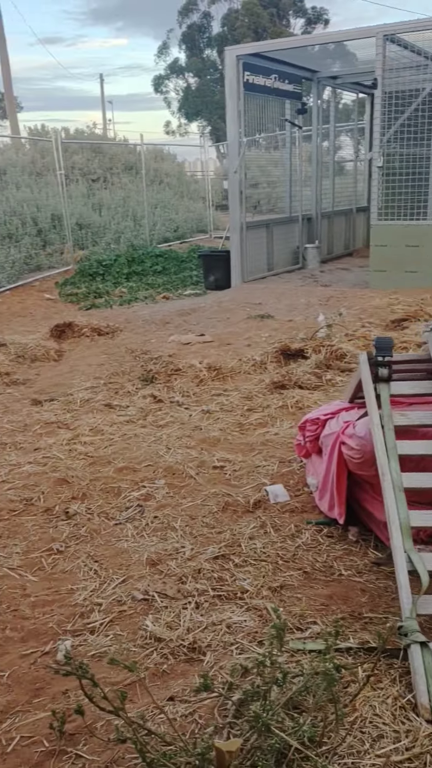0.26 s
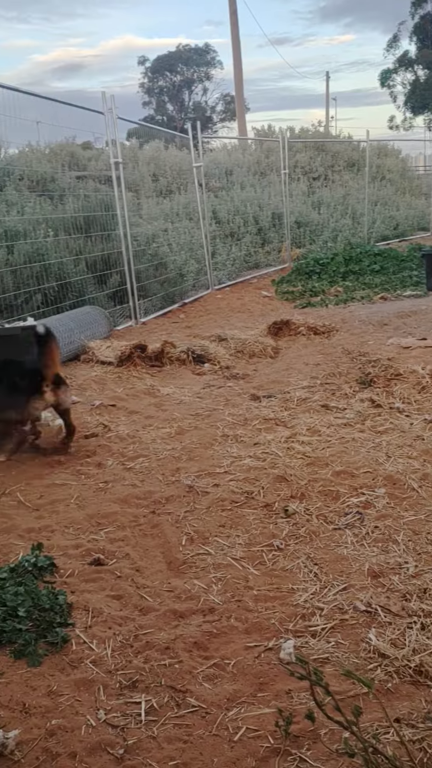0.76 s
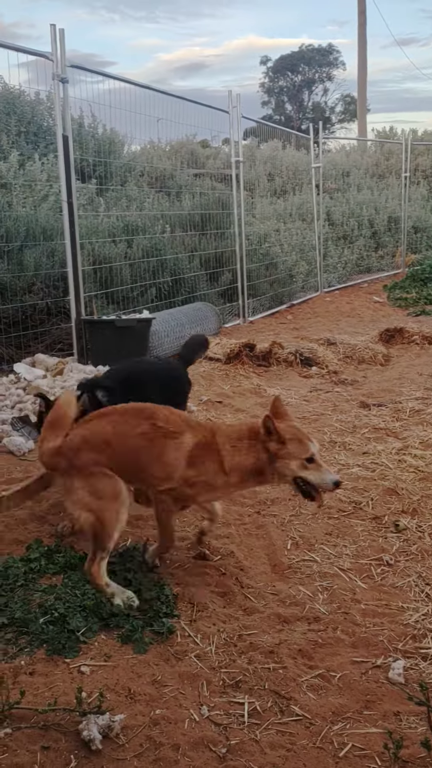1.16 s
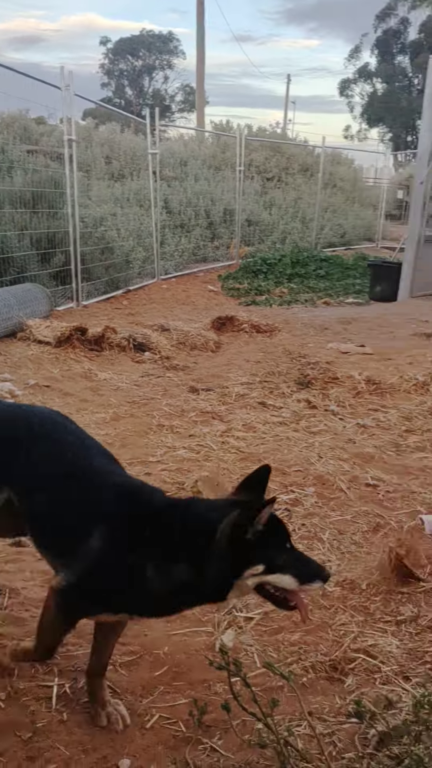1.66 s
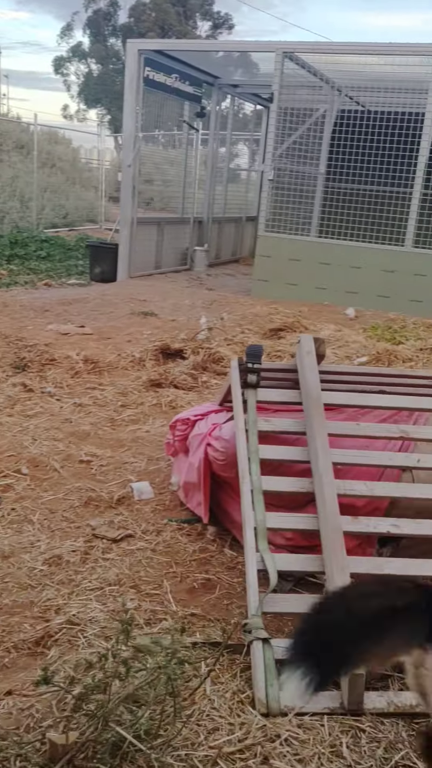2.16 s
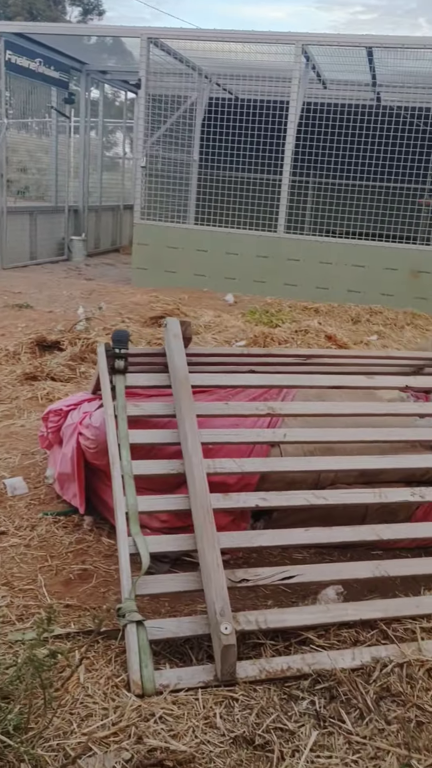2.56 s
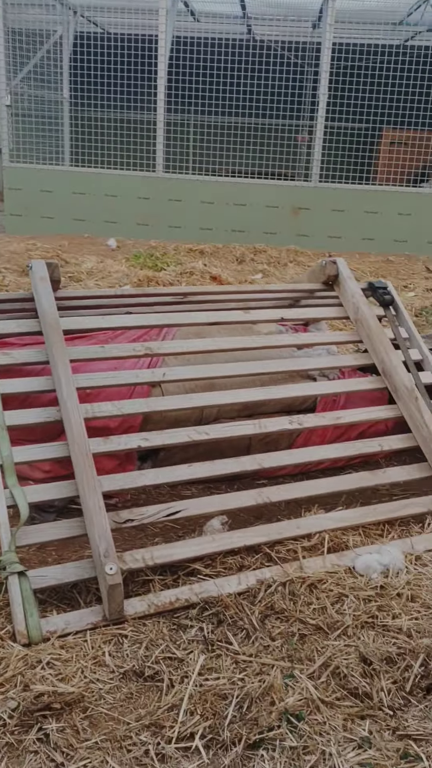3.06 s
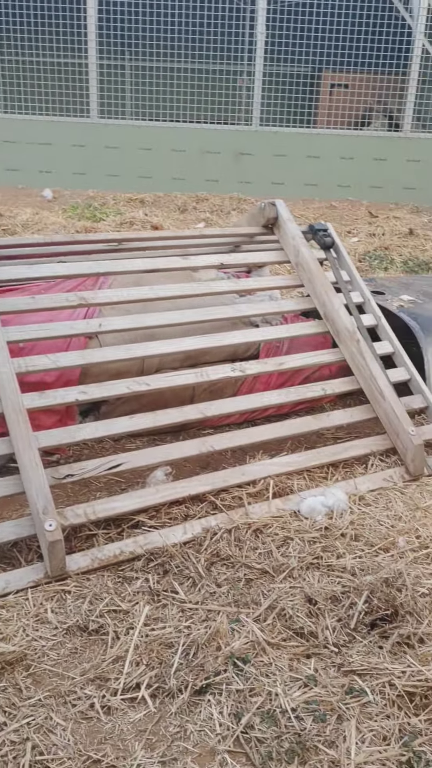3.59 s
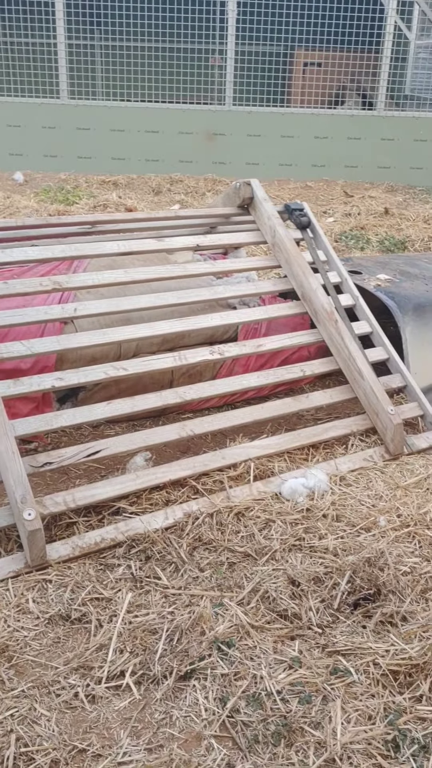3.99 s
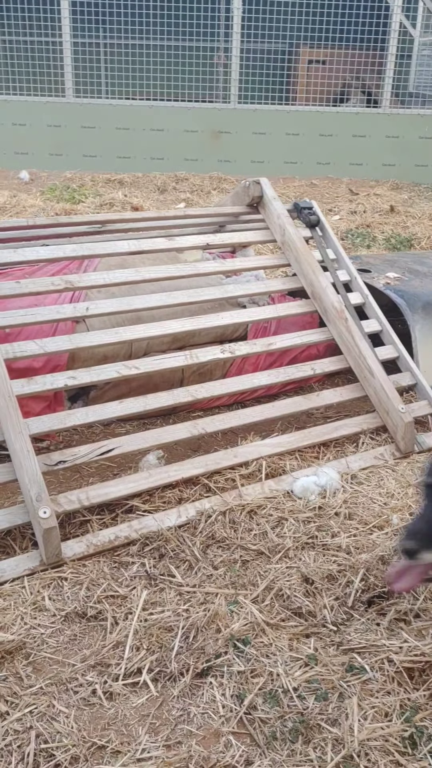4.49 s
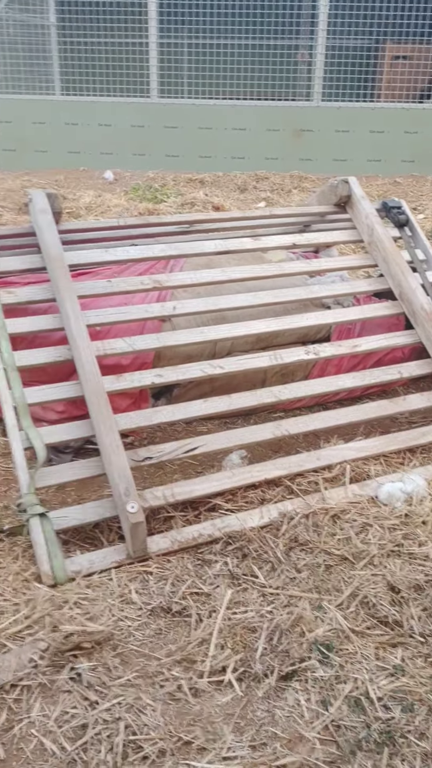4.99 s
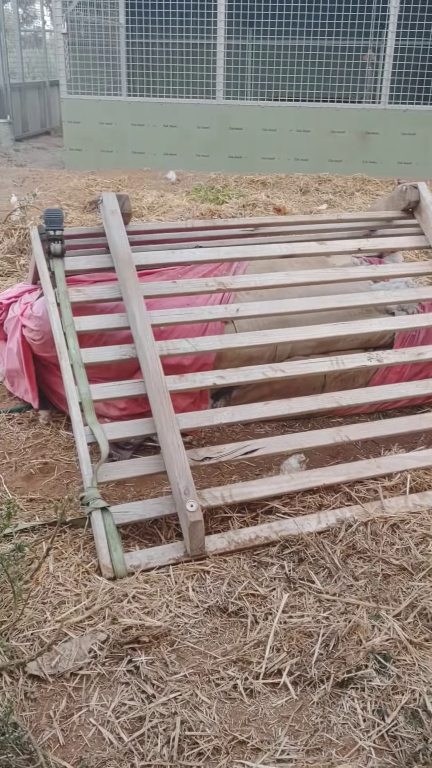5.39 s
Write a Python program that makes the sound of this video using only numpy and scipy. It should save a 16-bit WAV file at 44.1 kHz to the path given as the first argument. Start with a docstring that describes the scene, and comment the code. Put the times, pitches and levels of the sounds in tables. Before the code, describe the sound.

A quiet open yard with soft airy noise, heard in close stereo. Quick low paw thuds and a short pant start at once, fading by 0.3 s as a faint hum and insect chirrs on the left come through. Light knocks and a scuff land around 0.7 to 0.9 s. At 1.3 to 1.45 s a sharp yelp jumps out, with scuffs, thuds and straw snaps after it. From 1.7 to 1.86 s higher, rough yelps overlap. At 2.04 s a loud crack slams the metal pen, which rings and rattles, with two more yelps until 2.2 s and a brief echo. Then it calms: rustling, a cluster of thuds and knocks with a brief hum around 3.0 to 3.2 s. From 3.6 s to the end, soft intermittent panting, dry straw crackle, sparse footfalls and faint chirrs, with one thin bird whistle at 4.7 s.

```python
"""Dogs chase each other round a dirt yard strewn with straw, heard on two ports by a mesh and metal pen.
Under open air (coloured noise), paws thud (damped sines) and breath pants (noise through resonances);
an insect chirrs far to the left, a low hum comes and goes, then bumps ring the pen's modes.
Yelps (gliding harmonics and pulsed air) crowd the next second, amid scuffs and snapping straw (grains
and clicks). Later the panting returns, and a small bird gives one thin whistle near the middle."""
import sys
import numpy as np
from scipy import signal
from scipy.fft import rfft, irfft, next_fast_len
from scipy.io import wavfile

SR = 44100
rng = np.random.default_rng(int(sys.argv[2]) if len(sys.argv) > 2 else 0)


def generate_wav(signal):
    """Clip the signal to [-1, 1] and save it as 16-bit WAV at the path in sys.argv[1]."""
    frames = np.transpose(np.atleast_2d(signal))
    scaled = np.clip(frames, -1, 1) * 32767
    pcm = np.round(scaled).astype(np.int16)
    wavfile.write(sys.argv[1], SR, pcm)


N = 248724   # length in samples

# Open air over the yard. Each row: frequency in Hz, relative density in dB per Hz.
AIR = [(15, -58), (25, -0.5), (92, -5), (206, 0.5), (427, -12), (560, -8.5), (1230, -8.5), (3250, -15),
       (3920, -13), (4490, -21.5), (6210, -19.5), (8830, -30.5), (16000, -40.5)]
AIR_DB = -63.5
# Stereo image of the noise layers. Each row: frequency in Hz, left-right likeness from -1 to 1.
LIKENESS = [(60, 0.86), (180, 1), (550, 0.71), (1650, 0.25), (4970, -0.18), (15000, 0.023)]
# Stereo lean of the noise layers. Each row: frequency in Hz, left minus right in dB.
BALANCE_DB = [(60, -1), (180, 2.5), (550, 1), (1650, -0.5), (4970, 7), (15000, -9)]

# Swells of a low hum. Each row: full strength reached in seconds, hold in seconds, level in dB.
HUM_SWELLS = [(.324, 0.061, -55), (0.538, 0.16, -60), (2.617, 0.086, -57.5), (2.82, 0.19, -56.5),
              (3.156, 0.026, -47)]
HUM_HZ, HUM_RISE, HUM_FALL = 109, 340, 140   # Hz, dB per s, dB per s

# Insect chirrs. Each row: full strength reached in seconds, hold in seconds, pitch in Hz, level in dB.
CHIRRS = [(0.183, .005, 3810, -65), (0.3, 0.0039, 3610, -69), (1.028, 0.029, 3780, -69.5),
          (1.216, 0.018, 3760, -63.5), (1.28, .02, 3810, -69.5), (3.06, 0.028, 3870, -78),
          (3.208, 0.059, 3770, -64.5), (3.325, 0.05, 3760, -71), (3.45, 0.081, 3920, -67),
          (3.665, .06, 3950, -63), (3.748, 0.034, 4020, -73), (3.842, .01, 3940, -69),
          (4.246, 0.038, 3920, -77.5), (4.76, 0.012, 3800, -71)]
CHIRR_RISE, CHIRR_FALL = 220, 240   # dB per s
# Course of the bird's whistle. Each row: time in seconds, pitch in Hz, level in dB; both then waver.
WHISTLE = [(4.62, 5130, -105), (4.635, 5230, -67), (4.66, 5200, -64), (4.672, 5270, -82),
           (4.685, 5430, -65), (4.71, 5320, -59), (4.73, 4600, -76), (4.74, 4230, -92)]

# Paws pushing off or sliding. Each row: full strength reached in seconds, hold in seconds,
# ground rumble in dB, dirt scuff in dB, straw rustle in dB.
STRIDES = [(.01, 0.11, -43, -53.5, -70), (0.308, 0.13, -54.5, -56.5, -93), (0.456, 0.11, -71, -57, -68),
           (0.715, 0.01, -55, -43.5, -61.5), (0.855, 0.11, -61.5, -59, -62), (1.188, .01, -62.5, -62, -65),
           (1.384, 0.055, -65, -48, -55.5), (1.523, 0.008, -52, -45, -67), (1.564, 0.079, -51.5, -47, -48),
           (1.718, .03, -48.5, -42.5, -54), (1.799, 0.031, -44, -43, -51.5),
           (1.888, 0.05, -43.5, -55, -55.5), (1.996, 0.0099, -44, -46, -54.5),
           (2.044, 0.0017, -49, -30.5, -66), (2.055, 0.049, -39, -60, -55),
           (2.205, 0.016, -40.5, -45.5, -48), (2.38, 0.025, -45, -51, -48.5),
           (2.569, 0.032, -59.5, -60.5, -52), (2.746, 0.13, -59.5, -67, -59.5),
           (2.903, 0.0079, -70, -72, -57.5), (2.97, 0.0048, -55, -61, -62), (3.12, .02, -49, -45, -46.5),
           (3.202, 0.077, -52.5, -63, -54.5), (3.47, 0.057, -60.5, -84, -51.5),
           (3.676, 0.056, -60, -62.5, -46.5), (3.896, 0.1, -66, -80, -53.5), (4.019, 0.068, -56, -81, -49),
           (4.254, 0.092, -66, -79, -56.5), (4.416, 0.014, -48, -58, -55.5),
           (4.453, 0.021, -68, -55.5, -56), (4.554, 0.007, -65, -60, -52.5),
           (4.768, 0.011, -69, -79, -53.5), (4.948, 0.11, -75, -64.5, -59),
           (5.194, 0.012, -59.5, -57, -56.5), (5.415, 0.054, -63.5, -54.5, -62),
           (5.546, 0.016, -61.5, -87, -84)]
# Colour of the ground's rumble. Each row: frequency in Hz, relative density in dB per Hz.
RUMBLE = [(18, -94), (30, -35), (102, -2), (347, -11.5), (381, -20.5), (439, -22), (500, -22), (650, -61.5),
          (1100, -120)]
# Colour of scuffed dirt. Each row: frequency in Hz, relative density in dB per Hz.
SCUFF = [(180, -5.5), (300, 2.5), (459, -4), (647, 1.5), (743, 1), (1360, -2), (1970, -7), (3660, -7.5),
         (4750, -17.5), (8000, -21), (10400, -71), (17600, -120)]
# Colour of rustling straw. Each row: frequency in Hz, relative density in dB per Hz.
STRAW = [(2060, -18), (3500, -15.5), (3950, -3.5), (5220, -10), (5900, -4.5), (7900, -12.5), (15100, -16.5),
         (16000, -1)]
# rise and fall in dB per s, and the level in dB between strides
RUMBLE_RISE, RUMBLE_FALL, RUMBLE_BED_DB = 230, 189, -70.5
SCUFF_RISE, SCUFF_FALL, SCUFF_BED_DB = 1010, 165, -66.5
STRAW_RISE, STRAW_FALL, STRAW_BED_DB = 200, 117, -70

# Straws snapping. Each row: start in seconds, level in dB, click pitch in Hz, left minus right in dB.
SNAPS = [(0.2012, -55, 6110, 1), (0.38, -50.5, 4770, 3), (0.6722, -45.5, 3980, 9.0),
         (1.2745, -52.5, 4300, 19), (1.5255, -35.5, 5800, 11), (1.564, -37, 4500, 13),
         (1.693, -49, 6060, 4), (2.0043, -40.5, 5750, 6), (2.742, -49, 4340, 8), (2.9711, -53, 5900, -1),
         (3.4944, -47, 4420, -7), (3.575, -48.5, 2450, 3), (3.6499, -38.5, 6770, 6), (3.738, -43, 4600, -5),
         (3.8495, -49, 4220, -3), (3.9672, -42, 6900, 5), (3.9943, -52, 4310, 2.0), (4.079, -45, 7260, 0.5),
         (4.3456, -62, 4700, 5), (4.3799, -50, 2500, 0.5), (4.4494, -42, 5370, 0.5), (4.7471, -49, 6270, 6),
         (4.8297, -40.5, 4530, 9), (4.875, -44.5, 5770, 4), (4.9044, -56, 4610, 2.5),
         (4.9397, -55, 4780, 5.0), (4.9555, -53, 6040, 11), (5.5154, -54, 7540, 1.5)]
# Paws landing. Each row: start in seconds, peak in dB before placing, pitch in Hz, 60 dB decay in seconds.
THUDS = [(0.038, -30, 213, 0.023), (0.069, -32, 159, 0.035), (0.099, -30, 137, 0.062),
         (0.307, -42.5, 115, 0.07), (0.332, -49, 104, 0.062), (0.745, -34.5, 272, 0.015),
         (0.815, -50, 263, 0.045), (0.825, -44, 115, 0.038), (0.916, -44.5, 220, 0.027),
         (1.181, -50.5, 235, 0.096), (1.406, -31, 247, 0.019), (1.444, -28, 240, 0.044),
         (1.601, -29.5, 216, 0.013), (1.65, -33, 97, 0.023), (1.68, -38.5, 121, 0.11),
         (1.824, -37, 170, 0.2), (1.939, -39, 177, 0.074), (2.039, -27, 161.5, 0.15),
         (2.064, -33.5, 186, 0.18), (2.738, -50, 226, 0.085), (2.84, -46.5, 110, 0.06),
         (2.959, -34.5, 145, 0.047), (2.981, -39, 240, 0.049), (3.101, -36.5, 260, 0.032),
         (3.127, -37, 268, 0.026), (3.165, -31.5, 250, 0.045), (3.445, -46.5, 198, 0.062),
         (3.997, -41.5, 181, 0.12), (4.038, -42, 243, 0.083), (4.382, -38.5, 232, 0.093),
         (4.415, -45, 241, 0.018), (4.948, -50.5, 238, 0.054), (5.027, -37, 218, 0.014),
         (5.136, -47, 213, 0.013), (5.176, -47, 188, 0.12), (5.407, -60, 191, 0.038),
         (5.474, -45.5, 100, 0.14)]

# Bumps against the pen. Each row: start in seconds, crack peak in dB before placing, crack centre in Hz,
# crack width as a ratio, crack decay constant in seconds, rattle in dB relative to the crack,
# rattle decay constant in seconds, left minus right in dB, left lag in ms.
BUMPS = [(0.711, -26, 2780, 1.23, 0.013, -43, 0.014, 8, 0.046),
         (0.7493, -25, 1086, 3.1, 0.0018, -41, 0.008, 0.5, 0.056),
         (0.814, -56.5, 800, 1.8, 0.0015, -28.5, 0.009, 7.5, 0.059),
         (0.829, -47, 810, 5.4, 0.0025, -23, .01, 19, 0.048),
         (0.914, -44.5, 696, 5.8, 0.011, -41.5, .01, 6, 0.04),
         (1.603, -33.5, 594, 1.7, 0.0011, -37, 0.0094, 19, 0.066),
         (2.039, -15, 2050, 1.68, 0.0066, -14.5, 0.1, 2, -0.052),
         (2.983, -39, 1270, 1.36, 0.0064, -39, .01, -2, 0.0057),
         (3.098, -29.5, 1110, 1.55, 0.015, -8, 0.022, 0.5, 0.017),
         (3.451, -52, 700, 1.4, 0.0027, -6.5, 0.012, -3, 0.037)]
# Modes of the pen. Each row: pitch in Hz, 60 dB decay in seconds, relative dB when a panel is slammed,
# relative dB when the frame is knocked.
PEN_MODES = [(145.8, 0.616, -6, -18.5), (243.5, 0.57, -10, -3.5), (283.4, 0.46, -7, -4.5),
             (387.8, 0.502, -12, -14), (584.4, 0.47, -28, -8), (663.3, 0.39, -5, -3), (800, 0.15, 5.5, -22),
             (1080, .3, -39, -19), (1235, 0.1, -36, -3), (1306, 0.39, -19, -10), (1473, 0.69, -32, -12),
             (1590, .4, -22, -19), (2046, .2, -21, -20), (2050, 0.71, -10.5, -17.5),
             (2227, 0.59, -11.5, -19), (2880, .15, -9, -20), (2890, 0.15, -15, -14), (3386, 0.15, -23, -30),
             (3940, 0.38, -23, -12)]
MODE_SPLIT = 0.01188   # half the gap of a mode pair, as a share of its pitch
SLAM_DB = -20   # bumps with a higher peak slam a panel, the others knock the frame

# Panting breaths. Each row: full strength reached in seconds, hold in seconds, level in dB,
# lowest resonance offset in dB, brightness in dB per octave, 2.6 kHz resonance offset in dB.
BREATHS = [(0.046, 0.0064, -34, -28, -1, -1), (0.073, 0.042, -37, -46, -12, 7),
           (3.653, 0.09, -52.5, -12, 4.5, -5), (4.028, 0.048, -51, -2.5, 2.5, 3),
           (4.42, 0.02, -46.5, 12, 10.5, 5), (4.55, 0.073, -61, 1, 0, -4),
           (4.825, 0.037, -57.5, -19, 2, -14), (4.998, 0.046, -52.5, 6.5, 1.7, -1),
           (5.177, 0.052, -48.5, -16, -2, 6), (5.416, 0.043, -44.5, -24, 0, -1),
           (5.56, 0.041, -62, .4, -1, -12)]
# Resonances of the open mouth. Each row: centre in Hz, width in Hz, relative level in dB.
MOUTH = [(612, 130, -3), (1177, 193, 1), (1584, 204, -3.5), (2064, 300, -6.5), (2588, 180, -5.5),
         (3350, 1300, -11), (4130, 180, -11.5), (5630, 1400, -19.5)]
PANT_RISE, PANT_FALL = 640, 433   # dB per s

# Yelps, one list each. Each row: time in seconds, pitch in Hz, level in dB, roughness from 0 to 1.
YELPS = [
    [(1.3, 398, -61.5, 0.41), (1.318, 526, -44.5, 0.3), (1.327, 580, -37.5, 0.02), (1.337, 610, -55, 0.1)],
    [(1.315, 341.1, -46, 0.31), (1.33, 404, -42, 0.31), (1.342, 462, -35.5, 0.2), (1.36, 502, -19, 0.11),
     (1.38, 530, -16, 0.08), (1.40, 563, -25.5, 0.16), (1.42, 545.4, -21, 0.18), (1.44, 484, -31, 0.29),
     (1.465, 425, -54, 0.4)],
    [(1.63, 493, -70, 0.31), (1.655, 515.5, -42, 0.12), (1.69, 540, -42.5, 0.13), (1.715, 564, -37.5, 0.11),
     (1.735, 580, -59, 0.08)],
    [(1.703, 796.4, -56, 0.21), (1.713, 835, -48, 0.21), (1.724, 843, -22, 0.25), (1.732, 844, -30.5, 0.27),
     (1.743, 923, -31.5, 0.26), (1.755, 960, -28.5, 0.3), (1.768, 990, -58, 0.4)],
    [(1.742, 614.6, -62, .2), (1.76, 647, -21.5, 0.05), (1.78, 701.6, -13.5, 0.04), (1.79, 693, -23, 0.56),
     (1.81, 716.6, -22.5, 0.26), (1.83, 752.4, -27, 0.39), (1.845, 704, -28.5, 0.64), (1.86, 700, -62, 0.4)],
    [(2.05, 369, -59, 0.3), (2.062, 366.8, -27, 0.41), (2.072, 352.8, -35.5, 0.48),
     (2.092, 368.3, -21.5, 0.29), (2.11, 400.6, -27, 0.56), (2.135, 382, -68, 0.6)],
    [(2.095, 600, -52, 0.15), (2.108, 625.3, -20.5, 0.05), (2.135, 656, -26.5, 0.22),
     (2.16, 688, -20.5, 0.08), (2.175, 692.4, -24, 0.14), (2.195, 650, -32, 0.27)],
]
# Each yelp's manner and place. Each row: brightness in dB per octave around 1 kHz,
# left minus right in dB, left lag in ms.
YELP_PLACES = [(-15.5, -2.5, -0.077), (-1.5, -2.0, -0.054), (1, -0.5, -0.14), (7.5, -2, 0.068),
               (-0.5, -1, 0.098), (6, -1.5, -0.088), (-3.5, -0.5, -0.1)]
# Throat and mouth colour of a yelp's harmonics. Each row: frequency in Hz, relative level in dB.
THROAT = [(380, -1), (530, -17.5), (670, 0.5), (850, 0), (1100, 1), (1400, -4), (1600, -10.5),
          (2100, -11.5), (2700, -24), (3300, -37), (4100, -35), (5200, -56.5), (6600, -39.5), (9000, -65)]
# Air noise of a yelp. Each row: frequency in Hz, relative density in dB per Hz.
RASP = [(180, -39.5), (300, -13.5), (508, -17), (620, -7), (695, -14.5), (1140, -2), (1460, -8.5),
        (2140, -15.5), (9000, -81.5), (11700, -97.5), (19800, -120)]

ECHO_S, ECHO_DB = .049, -12   # slap from the shed's flat wall
YARD_T60_S, WALL_CUT_HZ, YARD_DB = 0.7, 4180, -18.5   # decay before wall losses, wall dullness, gain
CUTOFF_HZ = 16000


def from_db(db):
    """Amplitude ratio of a level in dB."""
    return 10 ** (np.asarray(db) / 20)


def rms_one(x):
    """Scale to an rms of 1."""
    return x / np.sqrt(np.mean(x ** 2) + 1e-20)


def in_time(rows):
    """Columns of a timed table, drawn as straight lines between its moments."""
    s, *columns = np.transpose(rows)
    return [np.interp(np.arange(N) / SR, s, c) for c in columns]


def at_hz(points, hz):
    """Value of a spectral table at hz, straight over log frequency."""
    points = np.array(points)
    return np.interp(np.log(hz), np.log(points[:, 0]), points[:, 1])


def sounding(rows, fade_s=0.029):
    """1 between a table's first and last moment, fading across both ends."""
    t = np.arange(N) / SR
    return np.clip(np.minimum(t - rows[0][0], rows[-1][0] - t) / fade_s + .5, 0, 1)


def swell(s, hold, db, rise, fall):
    """Gain that climbs to its level at s, holds and falls away, straight in dB."""
    t = np.arange(N) / SR
    below = np.maximum((s - t) * rise, (t - s - hold) * fall)
    return from_db(db - np.maximum(below, 0))


def burst(s, length):
    """Slice of the scene from moment s, and its time axis from zero."""
    i = round(s * SR)
    t = np.arange(min(round(length * SR), N - i)) / SR
    return slice(i, i + len(t)), t


def drift(rate):
    """Random wander of spread 1: noise through two equal low-pass poles at rate Hz."""
    r = np.exp(-40 * np.pi * rate / SR)   # runs at a twentieth of the sample rate
    noise = rng.standard_normal(N // 20 + 2002)
    slow = signal.lfilter([1], [1, -2 * r, r * r], noise)[2000:]
    return np.interp(np.arange(N) / 20, np.arange(len(slow)), rms_one(slow))


def ring(clicks, hz, t60):
    """A damped resonance: a unit click sets a sine of height 1 ringing."""
    r = from_db(-60 / (max(t60, 1e-4) * SR))
    w = 2 * np.pi * hz / SR
    return signal.lfilter([0, np.sin(w)], [1, -2 * r * np.cos(w), r * r], clicks + 1e-18)


def grains(per_s, spread_db):
    """Random clicks, uneven if spread_db is above 0, on a bed of noise; two independent rows."""
    sizes = from_db(spread_db * np.minimum(rng.exponential(1, (2, N)), 3.5))
    sizes = sizes * rng.choice([-1, 1], (2, N))
    clicks = sizes * (rng.random((2, N)) < per_s / SR)
    return rms_one(clicks) + 0.76 * rng.standard_normal((2, N))


def coloured(source, spectrum, patchy_db):
    """Give mid and side rows a spectrum and stereo image; overlapping octaves flicker apart; rms 1."""
    size = next_fast_len(N)
    hz = np.maximum(np.arange(size // 2 + 1) * SR / size, 1)
    mid, side = rfft(source, size) * from_db(at_hz(spectrum, hz))
    alike = np.clip(at_hz(LIKENESS, hz), -1, 1)
    sides = np.array([[1], [-1]])   # left, right
    pair = np.sqrt(1 + alike) * mid + np.sqrt(1 - alike) * side * sides
    pair = pair * from_db(at_hz(BALANCE_DB, hz) / 2 * sides)
    out, octave = 0, np.log2(hz)
    for centre in range(int(np.log2(spectrum[1][0])), 15):
        if centre - 1 < np.log2(spectrum[-1][0]):
            band = pair * np.clip(1 - abs(octave - centre), 0, 1)
            out = out + irfft(band, size)[:, :N] * from_db(patchy_db * drift(22.0))
    return rms_one(out)


def placed(x, pan_db, lag_ms):
    """Two microphone ports: level and arrival time differ between left and right."""
    n, half = np.arange(len(x)), lag_ms * SR / 2000
    left = np.interp(n - half, n, x) * from_db(pan_db / 2)
    right = np.interp(n + half, n, x) * from_db(-pan_db / 2)
    return np.array([left, right])


def open_air():
    """Steady coloured noise whose octaves flicker slightly."""
    return from_db(AIR_DB) * coloured(rng.standard_normal((2, N)), AIR, patchy_db=1.0)


def hum():
    """A low sine, slightly wavering in pitch and level, comes and goes in swells."""
    hz = HUM_HZ * (1 + .012 * drift(4))
    tone = np.sin(2 * np.pi * np.cumsum(hz) / SR) * from_db(1.5 * drift(4))
    return tone * sum(swell(*row, HUM_RISE, HUM_FALL) for row in HUM_SWELLS)


def insect():
    """Sines under a fast random wander make narrow, unsteady chirrs, far to the left."""
    t, unsteady = np.arange(N) / SR, drift(140)
    chirr = sum(np.sin(2 * np.pi * hz * t) * swell(s, hold, db, CHIRR_RISE, CHIRR_FALL)
                for s, hold, hz, db in CHIRRS)
    return placed(chirr * unsteady, pan_db=23.0, lag_ms=0.045)


def bird():
    """One thin whistle: a gliding sine, unsteady in pitch and level, near the middle."""
    hz, level_db = in_time(WHISTLE)
    tone = np.sin(2 * np.pi * np.cumsum(hz * (1 + .012 * drift(90))) / SR)
    whistle = tone * from_db(level_db + 4 * drift(50)) * sounding(WHISTLE)
    return placed(whistle, pan_db=-1.0, lag_ms=0.024)


def stir(column, rise, fall, bed_db):
    """Power sum of all strides over a steady bed."""
    powers = sum(swell(row[0], row[1], row[column], rise, fall) ** 2 for row in STRIDES)
    return np.sqrt(from_db(bed_db) ** 2 + powers)


def ground_rumble():
    """Low noise from the ground swells with each stride."""
    noise = coloured(rng.standard_normal((2, N)), RUMBLE, patchy_db=3.0)
    return stir(2, RUMBLE_RISE, RUMBLE_FALL, RUMBLE_BED_DB) * noise


def dirt_scuff():
    """Uneven grains and noise, as paws push or slide over dirt."""
    noise = coloured(grains(600, spread_db=3.5), SCUFF, patchy_db=2.5)
    return stir(3, SCUFF_RISE, SCUFF_FALL, SCUFF_BED_DB) * noise


def straw_rustle():
    """Denser, equal-sized grains and noise in the treble, as paws stir straw."""
    noise = coloured(grains(1800, spread_db=0.0), STRAW, patchy_db=4.5)
    return stir(4, STRAW_RISE, STRAW_FALL, STRAW_BED_DB) * noise


def snaps():
    """Each dry stalk breaks with a click that dies in a few cycles and a tiny crackle."""
    out, noise = np.zeros((2, N)), rng.standard_normal(N)
    for s, db, hz, pan_db in SNAPS:
        where, t = burst(s, .02)
        click = 1.66 * np.sin(2 * np.pi * hz * t) * np.exp(-t * hz / 1.3)
        crackle = 0.16 * noise[where] * np.exp(-t / 0.0033)
        out[:, where] += from_db(db + pan_db / 2 * np.array([[1], [-1]])) * (click + crackle)
    return out


def thuds():
    """A soft push on packed dirt: a low, damped swing."""
    out = np.zeros(N)
    for s, db, hz, t60 in THUDS:
        where, t = burst(s, .25)
        onset = np.minimum(t / 0.00255, 1)
        push = from_db(-60 * t / t60) * np.sin(2 * np.pi * hz * t) * onset
        out[where] += from_db(db) * push / np.abs(push).max()
    return placed(out, pan_db=2.1, lag_ms=.05)


def sheet(rattle, hz, t60):
    """A panel mode splits into a close beating pair; it carries the energy of one unit ring."""
    pair = ring(rattle, hz * (1 - MODE_SPLIT), t60) + ring(rattle, hz * (1 + MODE_SPLIT), t60)
    unit_energy = t60 * SR / (4 * np.log(1000))
    return pair * np.sqrt(unit_energy / np.sum(pair ** 2))


def bumps():
    """A crack of filtered noise and a bar's note, while loose sheet rattles and excites the pen's modes."""
    out, noise = np.zeros((2, N)), rng.standard_normal(N)
    offsets_db = rng.normal(0, 1.5, (len(BUMPS), len(PEN_MODES)))   # each bump rings the modes unevenly
    for bump, offsets in zip(BUMPS, offsets_db):
        s, db, hz, width, length, rattle_db, rattle_s, *place = bump
        where, t = burst(s, .9)
        hit = noise[where] * np.exp(-t / max(length, .001))
        hit[0] += 4.0   # the first contact
        band = signal.butter(2, [hz / width, hz * width], "band", fs=SR, output="sos")
        crack = signal.sosfilt(band, hit)
        bar_note = .5 * np.sin(2 * np.pi * hz * t) * np.exp(-t / 0.0036)
        crack = crack / np.abs(crack).max() + bar_note
        crack = crack / np.abs(crack).max()
        rattle = noise[where][::-1] * np.exp(-t / max(rattle_s, .001))
        rings = 0
        for (mode_hz, t60, slam, knock), offset in zip(PEN_MODES, offsets):
            mode_db = (slam if db > SLAM_DB else knock) + offset
            rings = rings + from_db(mode_db) * sheet(rattle, mode_hz, t60)
        out[:, where] += from_db(db) * placed(crack + from_db(rattle_db) * rings, *place)
    return out


def panting():
    """Turbulent breath through the mouth's resonances, each passed twice so the gaps stay dark."""
    air, flutter = rng.standard_normal(N), from_db(3.0 * drift(56))
    bands = []
    for k, (hz, width_hz, _) in enumerate(MOUTH):
        t60 = 1.4 / width_hz
        resonance = ring(ring(air, hz, t60), hz, t60)
        bands.append((-1) ** k * rms_one(resonance))   # neighbours in opposite polarity
    bands = np.array(bands)
    hz, _, mouth_db = np.transpose(MOUTH)
    out = 0
    for s, hold, db, low_db, bright_db, ring_db in BREATHS:
        strengths = mouth_db + bright_db * np.log2(hz / hz[1])
        strengths[0] += low_db
        strengths[4] += ring_db   # near 2.6 kHz
        breath = rms_one(from_db(strengths) @ bands)
        out = out + breath * swell(s, hold, db, PANT_RISE, PANT_FALL)
    return placed(out * flutter, pan_db=0.5, lag_ms=-0.11)


def yelps():
    """Vocal folds give harmonics on a gliding pitch; roughness shakes them and lets pulsed air through."""
    out = 0
    air = rms_one(coloured(rng.standard_normal((2, N)), RASP, patchy_db=6.0)[0])
    for rows, (bright_db, *place) in zip(YELPS, YELP_PLACES):
        where, _ = burst(rows[0][0] - .02, rows[-1][0] - rows[0][0] + .04)
        hz, level_db, rough = in_time(rows)
        rough = np.clip(rough, 0, 1)
        shaken_hz = hz * (1 + 0.1195 * rough * drift(159.0))
        phase = 2 * np.pi * np.cumsum(shaken_hz) / SR
        tone, hz = np.zeros(N), hz[where]
        for k in range(1, 15):
            db = at_hz(THROAT, k * hz) + bright_db * np.log2(k * hz / 1000)
            db = db + 8 * (rough * drift(60))[where]   # each harmonic shakes on its own
            tone[where] += from_db(db) * np.sin(k * phase[where])
        pulsed_air = air * (1 + 0.62 * np.cos(phase))
        call = (1 - rough) * tone + 1.07 * rough * pulsed_air
        out = out + placed(from_db(level_db) * sounding(rows) * call, *place)
    return out


def slap(x):
    """The shed's flat wall throws each call back once."""
    lag = round(ECHO_S * SR)
    return x + from_db(ECHO_DB) * np.pad(x, ((0, 0), (lag, 0)))[:, :N]


def yard(x):
    """Reflections between pen and fences: twelve dull feedback delays a side."""
    size = next_fast_len(N + SR)
    turn = -2j * np.pi * np.arange(size // 2 + 1) / size   # phase of a one-sample delay
    dull = np.exp(-2 * np.pi * WALL_CUT_HZ / SR)
    wall = (1 - dull) / (1 - dull * np.exp(turn))
    out = np.zeros((2, len(turn)), complex)
    lags = (rng.uniform(.010, .065, 24) * SR).astype(int)
    for k, lag in enumerate(lags):
        loop = from_db(-60 * lag / SR / YARD_T60_S) * wall * np.exp(turn * lag)
        out[k % 2] += from_db(YARD_DB) * loop / (1 - loop) * (-1) ** (k // 2)
    shared = 0.4   # share of the reflections that both ports hear alike
    out = shared * out.sum(axis=0) + (1 - shared) * out
    return irfft(rfft(x, size) * out, size)[:, :N]


def scene():
    """Air, hum, songs, paws and breath lie around the yelps and bumps, which alone feed the yard."""
    background = open_air() + hum() + insect() + bird()
    paws = ground_rumble() + dirt_scuff() + straw_rustle() + snaps() + thuds()
    loud = bumps() + slap(yelps())
    return background + paws + panting() + loud + yard(loud.mean(axis=0))


def record(dry):
    """The microphone's deep bass is rolled off, the top is cut."""
    dry = signal.sosfilt(signal.butter(2, 80, "high", fs=SR, output="sos"), dry)
    return signal.sosfilt(signal.cheby2(24, 70, CUTOFF_HZ, fs=SR, output="sos"), dry)


dry = scene()
out = record(dry)
generate_wav(out)
```